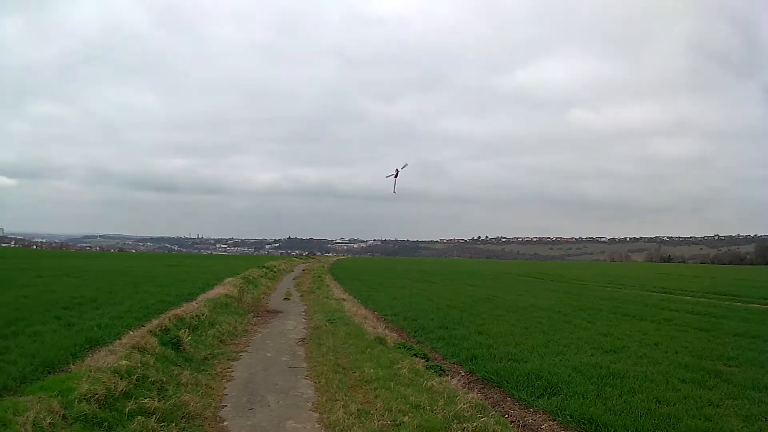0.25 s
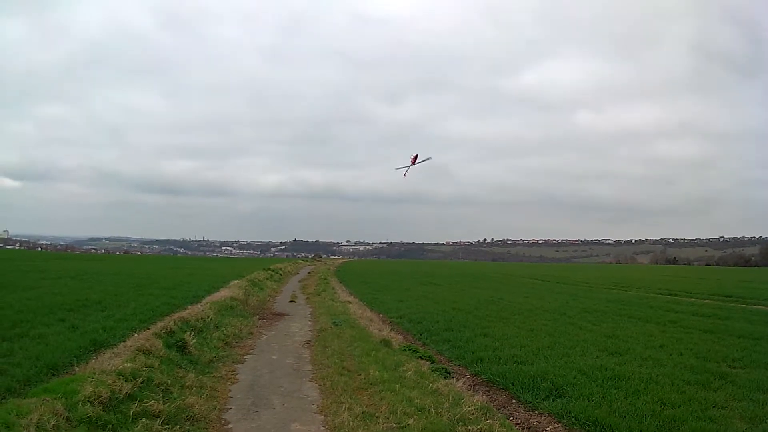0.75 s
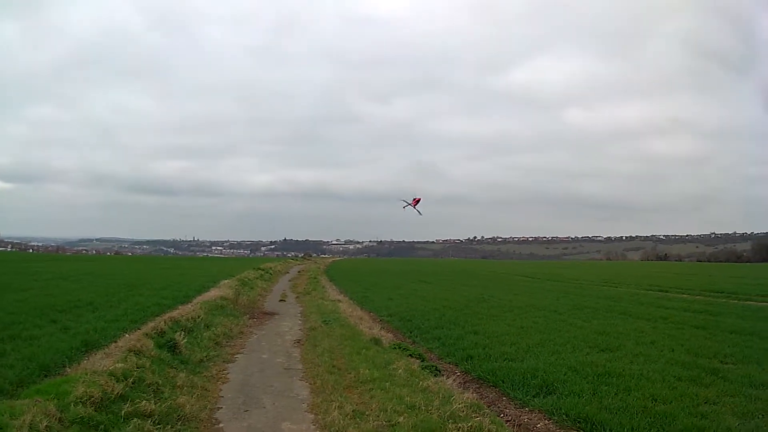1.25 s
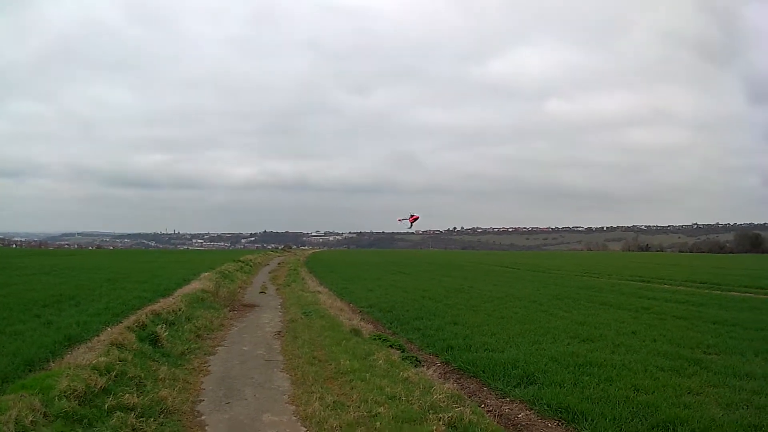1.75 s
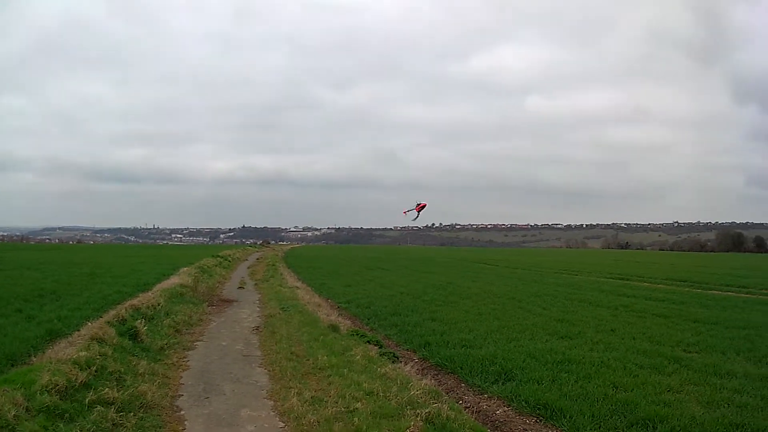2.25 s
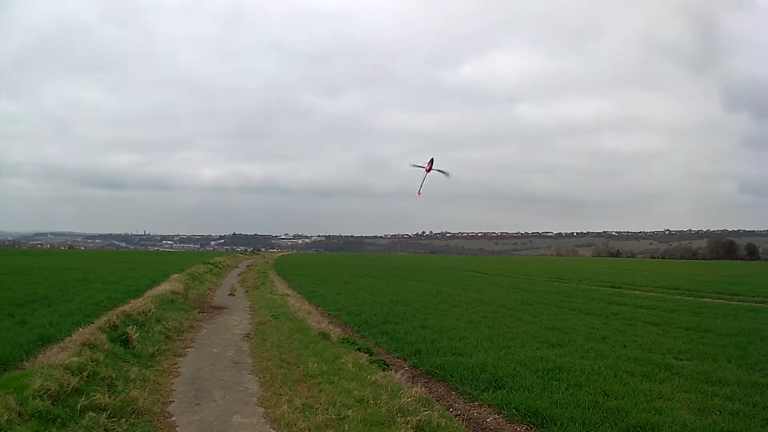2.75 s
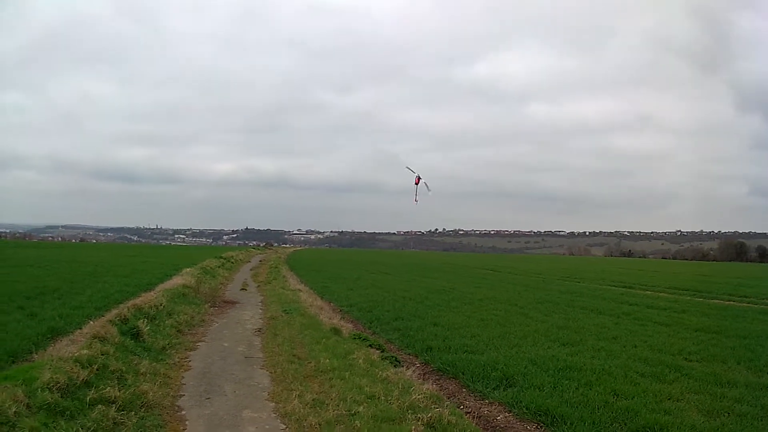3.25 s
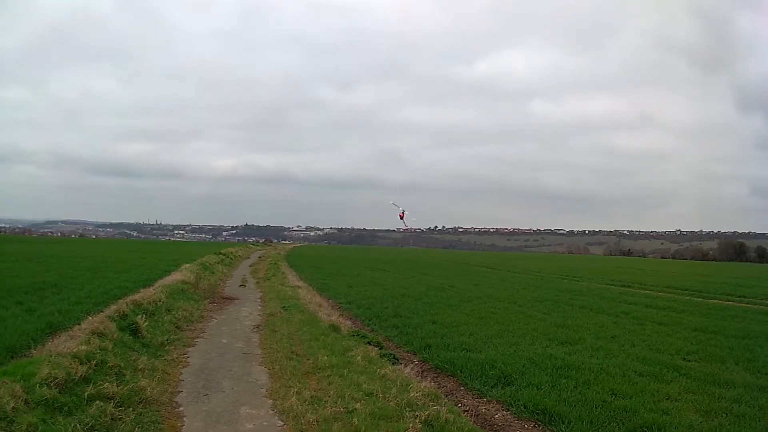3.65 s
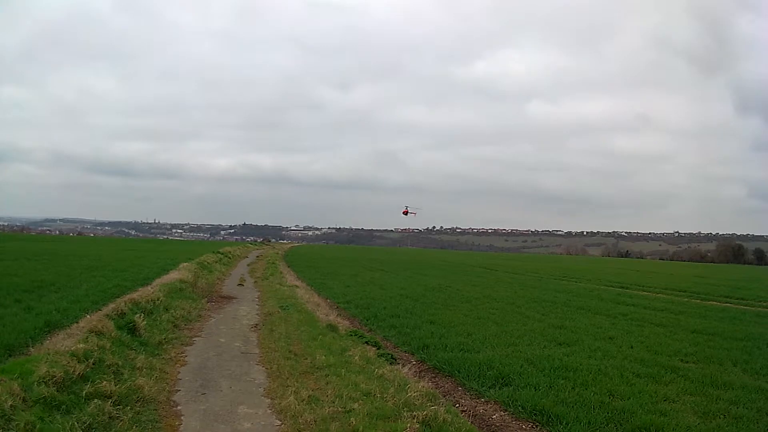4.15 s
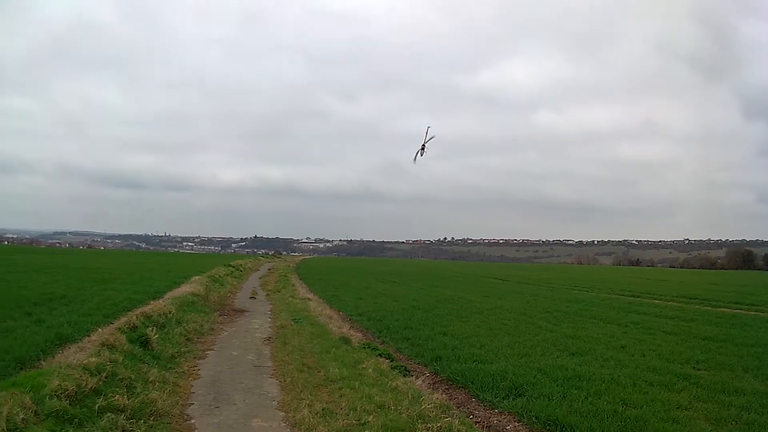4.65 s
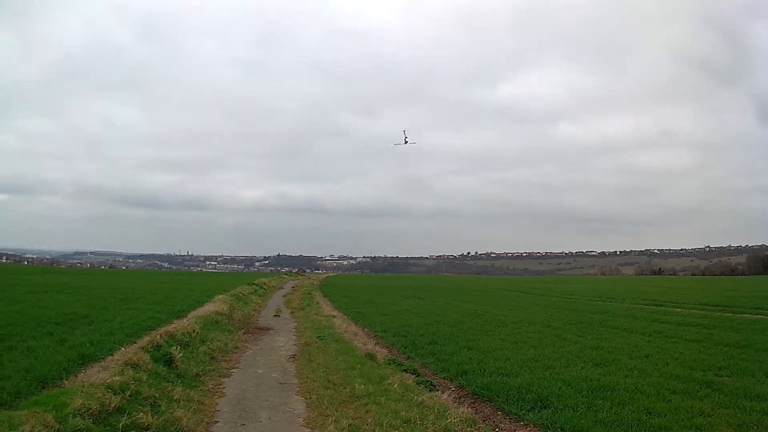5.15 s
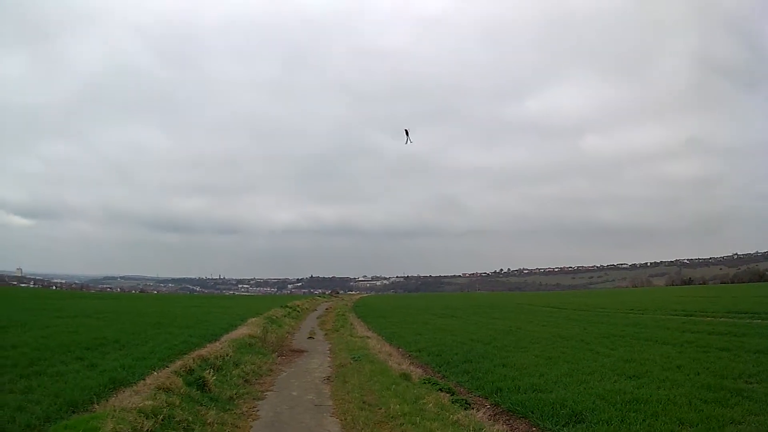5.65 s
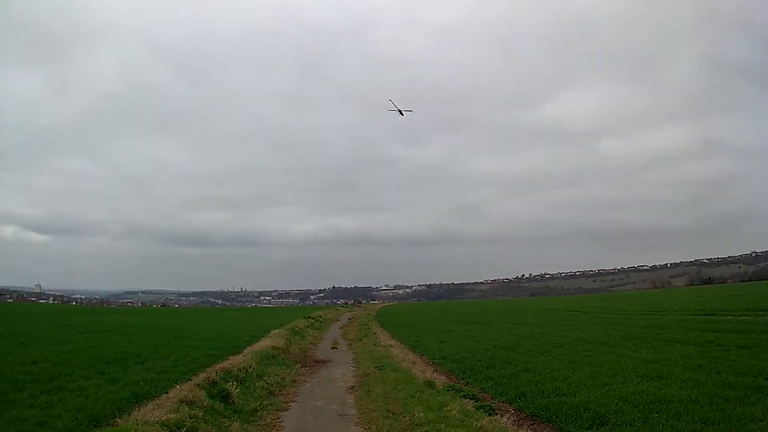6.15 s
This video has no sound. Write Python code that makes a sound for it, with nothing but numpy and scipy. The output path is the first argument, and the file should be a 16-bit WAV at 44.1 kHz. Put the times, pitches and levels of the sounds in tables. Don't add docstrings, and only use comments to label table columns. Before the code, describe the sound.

Thin high gear whine and fluttering rotor swish from a tumbling model helicopter, interrupted by crunchy wind bursts on the microphone over low rumble.

```python
import sys
import numpy as np
from scipy import signal
from scipy.fft import rfft, irfft, next_fast_len
from scipy.io import wavfile
from scipy.ndimage import uniform_filter1d

SR = 44100
rng = np.random.default_rng(int(sys.argv[2]) if len(sys.argv) > 2 else 0)


def volts_from_decibels(level):
    exponent = np.asarray(level, float) / 20
    return 10 ** exponent


def dump_mix(stems):
    frames = np.atleast_2d(stems).T
    limited = np.clip(frames, -1, 1)
    pcm = np.round(limited * 32767).astype(np.int16)
    wavfile.write(sys.argv[1], SR, pcm)


N = 281799
TIME_S = np.arange(N) / SR
MAIN_TEETH = 153
GUST_EDGE_S = 0.0044

# start_s, hiss_db, swish_db, blade chop (0-1)
FLIGHT = [(0.0, -42.5, -66.5, 0), (0.14, -38, -45, 0.94), (0.37, -39.5, -42, 0.53),
          (0.64, -43.5, -51, 0.45), (1.26, -38.5, -50, 0.2), (2.01, -38, -58, 0.25),
          (2.17, -38, -52.5, 0.3), (2.61, -39.5, -42.5, 0.18), (3.17, -40.5, -55.5, 0.43),
          (3.29, -39.5, -44.5, 0.23), (3.61, -37, -44.5, 0.7), (3.76, -39, -57.5, 0.25),
          (4.5, -39.5, -55.5, 0.26), (5.11, -44, -65.5, 0.35), (5.33, -45, -53.5, 0.45),
          (5.52, -48, -62, 0.1), (5.77, -46.5, -51.5, 0.3), (6.39, -50, -57, 0.2)]
# start_s, length_s, level_db, swell_db (first to second half)
PORT_GUSTS = [(0.283, 0.063, -15, 0), (0.417, 0.051, -16, -3), (0.47, 0.05, -18, -6),
              (0.548, 0.1, -16, -4.5), (0.834, 0.044, -19.5, -3), (1.005, 0.05, -18, -7.5),
              (1.167, 0.028, -20, -4), (1.207, 0.046, -20, -6.5), (1.452, 0.059, -20, 6.5),
              (1.512, 0.049, -17.5, 5.5), (2.047, 0.15, -13.5, -1), (2.258, 0.058, -18.5, -8.5),
              (2.349, 0.12, -18.5, 0), (2.504, 0.02, -17, -5), (2.527, 0.095, -13.5, 1),
              (2.665, 0.054, -19.5, -13.5), (2.721, 0.062, -24.5, -10.5), (2.78, 0.092, -20, -3.5),
              (2.876, 0.093, -13.5, 5), (2.971, 0.109, -15.5, 3), (3.136, 0.047, -22.5, -6.5),
              (3.187, 0.053, -17.5, -3), (3.482, 0.069, -19, 8), (3.634, 0.069, -17, 6.5),
              (3.709, 0.057, -16, -1.5), (5.068, 0.0137, -21, 5), (5.099, 0.0254, -25.5, 5.5),
              (5.138, 0.08, -23, 4.5), (5.342, 0.028, -23, 4), (6.06, 0.058, -27, 10)]
# start_s, pressure_swing_db, depth_db (deep over flutter), eddy_pitch_hz
WIND = [(0, -57.5, 10, 780), (.45, -56, 10, 830), (.8, -45, -1, 650), (1.2, -55, 3, 676),
        (1.56, -44, 4, 490), (1.71, -51, 5, 560), (2.35, -42.5, -3, 591.5), (3.2, -52, 8, 481),
        (3.5, -46.5, 5, 628), (3.84, -51, -5, 520), (4.31, -56, 6, 500), (4.47, -40, 6, 460),
        (4.58, -48, -1.5, 460), (4.85, -35.5, 1.5, 650), (5.0, -47.5, 1, 690), (5.17, -32.5, -0.5, 603),
        (5.5, -55.5, 7.5, 440), (6.39, -55, 6, 360)]


def rms_one(x):
    return x / np.sqrt(np.mean(x ** 2) + 1e-20)


def in_time(rows):
    s, *columns = np.transpose(rows)
    return [np.interp(TIME_S, s, c) for c in columns]


def drift(rate):
    r = np.exp(-80 * np.pi * rate / SR)
    white = rng.standard_normal(N // 40 + 2002)
    slow = signal.lfilter([1], [1, -2 * r, r * r], white)[2000:]
    return np.interp(np.arange(N) / 40, np.arange(len(slow)), rms_one(slow - slow.mean()))


def coloured(x, spectrum):
    size = next_fast_len(N)
    hz, db = np.transpose(spectrum)
    log_hz = np.log(np.fft.rfftfreq(size, 1 / SR) + 1)
    gain = volts_from_decibels(np.interp(log_hz, np.log(hz), db, left=-90, right=-90))
    return rms_one(irfft(rfft(x, size) * gain, size)[:N])


def band(x, low_hz, high_hz):
    return signal.sosfilt(signal.butter(2, [low_hz, high_hz], "band", fs=SR, output="sos"), x)


def line(turns, order, waver_db):
    dip = np.minimum(drift(6.5), .9)
    phase = 2 * np.pi * (order * turns + rng.random())
    return np.sqrt(2) * volts_from_decibels(waver_db * dip) * np.sin(phase)


def gust_level():
    # start_s, length_s, level_db
    short_puffs = [(0.152, 0.024, -27.5), (0.207, 0.018, -19), (0.348, 0.025, -25.5), (0.379, 0.037, -20),
                   (0.706, 0.005, -24), (0.808, 0.0037, -26.5), (1.063, 0.005, -15.5), (1.14, 0.008, -15.5),
                   (1.307, 0.0063, -28), (1.369, 0.016, -24.5), (1.42, 0.009, -20.5), (1.577, 0.0047, -25),
                   (1.588, 0.014, -25.5), (1.916, 0.0052, -34), (2.009, 0.015, -29.5),
                   (2.217, 0.011, -17.5), (2.484, 0.011, -26.5), (2.627, 0.024, -13.5), (3.097, 0.013, -12),
                   (3.398, 0.027, -30), (4.86, 0.012, -15.5), (4.786, 0.022, -39), (4.938, 0.006, -20),
                   (4.952, 0.0069, -30), (5.016, 0.01, -20.5), (5.243, 0.045, -37), (5.46, 0.011, -31),
                   (5.477, 0.008, -30.5), (6.375, 0.008, -33)]
    level = np.zeros(N)
    for s, length, db, swell_db in PORT_GUSTS + [(*puff, 0) for puff in short_puffs]:
        first, last = int((s - GUST_EDGE_S) * SR), int((s + length + GUST_EDGE_S) * SR)
        inside = slice(max(first, 0), last)
        since, left = TIME_S[inside] - s, s + length - TIME_S[inside]
        edge = np.clip(np.minimum(since, left) / GUST_EDGE_S + .5, 0, 1)
        swell = 2 * swell_db * np.clip(since / length - .5, -1 / 4, 1 / 4)
        level[inside] += edge ** 2 * volts_from_decibels(db + swell)
    return level


def rumble(level):
    breeze_db, depth_db, _ = in_time(WIND)
    wake = uniform_filter1d(level, round(0.05 * SR))
    deep = rms_one(band(rng.standard_normal(N), 44, 163))
    deep = deep * volts_from_decibels(2.0 * drift(23.0) + 1.75 * drift(4.7))
    flutter = rms_one(band(rng.standard_normal(N), 107, 334))
    flutter = flutter * volts_from_decibels(2.2 * drift(23.0) + 2.0 * drift(6.3))
    deep_level = volts_from_decibels(breeze_db + depth_db / 2) + volts_from_decibels(-25) * wake
    flutter_level = volts_from_decibels(breeze_db - depth_db / 2) + volts_from_decibels(-22.5) * wake
    return deep_level * deep + flutter_level * flutter


def gusts(level):
    # pitch_hz, density_db (per Hz)
    rush_spectrum = [(35, -47), (60, 16), (223, -42), (382, -11), (641, 33), (771, 20), (1080, 16.5),
                     (1710, -4), (2820, -39), (5000, -8), (6500, -72), (11000, -120)]
    # start_s, share of the full rate (0-1)
    crowding = [(0, 1), (4.88, 1), (4.9, .4), (5.09, .35), (5.1, .85), (6.39, 1)]
    eddies_per_s, size_spread_db, ring_cycles, pitch_spread_oct = 1400, 3.5, 3.75, 0.42
    octaves_per_db = 0.06

    gust_db = 20 * np.log10(10 * level + .01)
    pitch_hz = in_time(WIND)[2] * 2 ** (octaves_per_db * gust_db)
    sizes = volts_from_decibels(size_spread_db * np.minimum(rng.exponential(1, N), 4)) * rng.choice([-1, 1], N)
    crowd = in_time(crowding)[0]
    chance = crowd * eddies_per_s * volts_from_decibels(3.0 * drift(40.0)) / SR
    eddies = sizes * (rng.random(N) < chance)
    octave = np.log2(pitch_hz / 150) + pitch_spread_oct * rng.standard_normal(N)
    chosen = np.round(4 * octave)
    rings = np.zeros(N)
    for k in range(18):
        hz = 150 * 2 ** (k / 4)
        r = volts_from_decibels(-60 * hz / (ring_cycles * SR))
        w = 2 * np.pi * hz / SR
        struck = eddies * (chosen == k) + 1e-18
        rings += signal.lfilter([0, np.sin(w)], [1, -2 * r * np.cos(w), r * r], struck)
    rings = band(band(rings, 270, 1900), 90, 2400) * volts_from_decibels(2.5 * drift(45.0))
    even = rings / np.sqrt(uniform_filter1d(rings ** 2, size=900) + 1e-6)
    rush = coloured(rng.standard_normal(N), rush_spectrum)
    crisp = np.clip((pitch_hz / 750) ** 2.2 * (level / 0.024) ** 0.43, 0, 1.3)
    flow = volts_from_decibels(-1.5) * even + volts_from_decibels(-14.0) * crisp * crowd * rush
    return level * (flow + (crisp - 1) * band(flow, 1390, 11000))


def snaps():
    # start_s, peak_db
    slaps = [(0.424, -6), (0.838, -11), (1.01, -12), (1.026, -15), (1.558, -14), (1.601, -8), (2.117, -1),
             (2.273, -3), (2.294, -5.5), (2.372, -7), (2.892, -4.5), (3.531, -0.5), (4.826, -34),
             (4.853, -9), (4.858, -7.5), (4.876, -17.5), (4.939, -17.5), (4.977, -31), (4.997, -10),
             (5.0, -18), (5.028, -14), (5.037, -18), (5.049, -13), (5.058, -20), (5.062, -7.5),
             (5.083, -20), (5.091, -23), (5.228, -21), (5.466, -35), (5.489, -36)]
    front_db = 2.5
    fronts = [(s + GUST_EDGE_S / 4, db - swell_db / 2 + front_db) for s, _, db, swell_db in PORT_GUSTS]
    s, db = np.transpose(slaps + fronts)
    clicks = np.zeros(N)
    clicks[(s * SR).astype(int)] = volts_from_decibels(db + 27)
    return band(band(clicks, 344, 1464), 187, 2170)


def swings():
    # start_s (centre), hiss_gain_db
    sweeps = [(.22, 1.5), (.47, 1.5), (.85, 1), (1.1, 2), (1.33, 4.5), (1.52, 3), (1.75, 4), (1.95, -1.5),
              (2.17, 4), (2.56, 1.5), (2.74, 1.5), (3.0, 3.5), (3.28, 3), (3.6, 5.5), (3.95, -0.5),
              (4.14, 3.5), (4.53, 2.5), (4.76, 3), (5.05, 2), (5.35, 3.5), (5.75, 0.5), (6.05, 1), (6.3, 5)]
    width_s = 0.052
    return sum(db * np.exp(-((TIME_S - s) / width_s) ** 2) for s, db in sweeps) - 2.0


def airframe(turns):
    # pitch_hz, density_db (per Hz)
    hiss_spectrum = [(2060, -19.5), (3500, -10.5), (4810, -7), (5320, -3), (5660, -1.5), (5770, -2.5),
                     (7980, -4.5), (8710, 1.5), (9680, 3), (11200, -1.5), (12600, -15), (15600, -22)]
    # pitch_hz, density_db (per Hz)
    swish_spectrum = [(240, -58), (400, -8.5), (758, -5), (926, -7), (2070, -3), (4020, -11), (5290, -15.5),
                      (8000, -12.5), (10400, -19), (17600, -120)]
    # start_s (centre), half_length_s, level_db
    hard_pulls = [(4.7, 0.23, -54), (5.8, 0.31, -49)]
    # rotor orders, then level_db re hiss
    tail_orders, tail_levels_db = [2, 28 / 3, 56 / 3, 28, 112 / 3], [-15, -12, -24, -25, -26]
    blade_phase = .34
    repeat_db = -3.5
    echo_s, echo_db = .00043, -21

    hiss_db, swish_db, chop = in_time(FLIGHT)
    pull = volts_from_decibels(-65) + sum(volts_from_decibels(db) * np.exp(-((TIME_S - s) / half) ** 2) for s, half, db in hard_pulls)
    blade = 2 * np.pi * (2 * turns + blade_phase)
    passing = np.exp(1.3 * np.cos(blade))
    throb = 1 + np.clip(chop, 0, 1) * (passing / passing.mean() - 1)
    swing_db = swings()

    flaws = rng.standard_normal((2, 1024))
    place = (turns * 1024).astype(int) % 1024
    teeth = sum(volts_from_decibels(1.5 * drift(2.5)) * f[place] for f in flaws)
    grit = rng.standard_normal(N) + volts_from_decibels(repeat_db) * rms_one(teeth)
    hiss_gain = volts_from_decibels(0.83 * swing_db + 1.25 * np.clip(drift(6.5), -2, 1.2))
    hiss = coloured(grit * throb ** 0.48 * hiss_gain, hiss_spectrum)
    bright_gain = volts_from_decibels(0.45 * swing_db + 2.2 * np.clip(drift(8.4), -2, 1.2))
    hiss += (bright_gain - 1) * band(hiss, 8500, 13600)
    canopy_gain = volts_from_decibels(2.5 * np.clip(drift(8.0), -2, 1.5))
    hiss += (canopy_gain - 1) * band(hiss, 8600, 9500)

    swish = coloured(rng.standard_normal(N) * throb * volts_from_decibels(2.34 * drift(11.2)), swish_spectrum)
    wake_noise = rms_one(band(rng.standard_normal(N), 1330, 4000))
    slap = chop ** 2 * passing ** 2 * wake_noise / passing.max() ** 2
    hum = sum(line(turns, order, waver_db=5.0) for order in range(12, 28, 2))
    thump = rms_one(band(hum, 430, 970))
    tail = sum(volts_from_decibels(db) * line(turns, order, waver_db=1.5)
               for order, db in zip(tail_orders, tail_levels_db))

    low = volts_from_decibels(swish_db + 7.0) * (swish + volts_from_decibels(5.5) * slap)
    low += pull * volts_from_decibels(-5.0 + 1.9 * drift(4.7)) * thump
    lag = round(echo_s * SR)
    low[lag:] += volts_from_decibels(echo_db) * low[:-lag]
    return volts_from_decibels(hiss_db + 1.0) * hiss + low + volts_from_decibels(hiss_db - 4.5) * tail


def whine(turns):
    # start_s, mesh_db, second_harmonic_db, tail_gear_db
    aspect = [(0, -56, -53, -64), (.32, -50, -52, -72), (.64, -51, -50, -63), (1.1, -47, -52, -64),
              (1.3, -45, -43, -61), (1.7, -42, -41, -65), (2.24, -45, -43, -62), (2.6, -50, -55, -63),
              (3.02, -49, -47, -57), (3.36, -51, -54, -60), (3.8, -42, -42, -57), (4.25, -42, -41, -60),
              (4.5, -47, -50, -61), (4.8, -48, -50, -57), (5.12, -56, -51, -64), (5.3, -53.5, -55, -68),
              (5.8, -52, -58, -64), (6.3, -60, -60, -67)]
    gear_lines = [84, 42, 102, 245, 274]
    gear_levels = [2, -7, -6, 1, 2]
    # level_db, a row per mesh harmonic
    pinion_levels = [
        [0, -3, -7, -3, -6],
        [-2, -11, -14, -1, -6],
    ]
    # level_db, a row per mesh harmonic
    spoke_levels = [
        [-7, -12],
        [2, -1],
    ]
    # level_db re their mesh line, a row per mesh harmonic
    rotor_levels = [
        [-16, -13, -14, -17],
        [-19, -20, -18, -18],
    ]
    pinion, spokes = MAIN_TEETH / 15, 8
    pinion_steps = [-pinion, pinion, 2 * pinion, spokes, 2 * spokes]
    spoke_steps, rotor_steps = [-spokes, -2 * spokes], [-2, -1, 1, 2]

    mesh_db, second_db, tail_db = in_time(aspect)
    pinion_db = .75 * (mesh_db + 42) - 42.5 - 11.5
    spoke_db = in_time(FLIGHT)[0] - 15
    out = sum(volts_from_decibels(tail_db + db) * line(turns, order, waver_db=3.0)
              for order, db in zip(gear_lines, gear_levels))
    for k, level_db in enumerate((mesh_db, second_db)):
        order = (k + 1) * MAIN_TEETH
        flicker_db = np.clip(-.4 * (level_db + 40), 1.2, 4.2)
        out += volts_from_decibels(level_db + .3 * flicker_db) * line(turns, order, waver_db=flicker_db)
        families = ((pinion_db, pinion_steps, pinion_levels), (spoke_db, spoke_steps, spoke_levels),
                    (level_db, rotor_steps, rotor_levels))
        for base_db, steps, levels in families:
            sidebands = sum(volts_from_decibels(db) * line(turns, order + step, waver_db=2.5)
                            for step, db in zip(steps, levels[k]))
            out += volts_from_decibels(base_db) * sidebands
    return out * volts_from_decibels(.8 * swings() + .6)


def scene():
    # start_s, pitch_hz
    mesh_pitch = [(0, 5455), (.33, 5520), (.78, 5666), (1.19, 5562), (2.1, 5546), (2.43, 5414),
                  (2.66, 5497), (2.97, 5441), (3.24, 5494), (3.88, 5494), (4.36, 5464), (4.58, 5338),
                  (4.8, 5322), (5.2, 5468), (5.5, 5228), (5.62, 5334), (5.94, 5418), (6.3, 5470)]
    mesh_hz = uniform_filter1d(in_time(mesh_pitch)[0], size=4000)
    turns = np.cumsum(mesh_hz / MAIN_TEETH / SR)
    level = gust_level()
    wind = rumble(level) + gusts(level) + snaps()
    return (wind + airframe(turns) + whine(turns))[None]


def top_cut(x):
    return signal.sosfilt(signal.butter(12, 15710, fs=SR, output="sos"), x)


def record(dry):
    mix = 1.188 * np.tanh(dry / 1.254)
    return top_cut(mix)


dry = scene()
out = record(dry)
dump_mix(out)
```